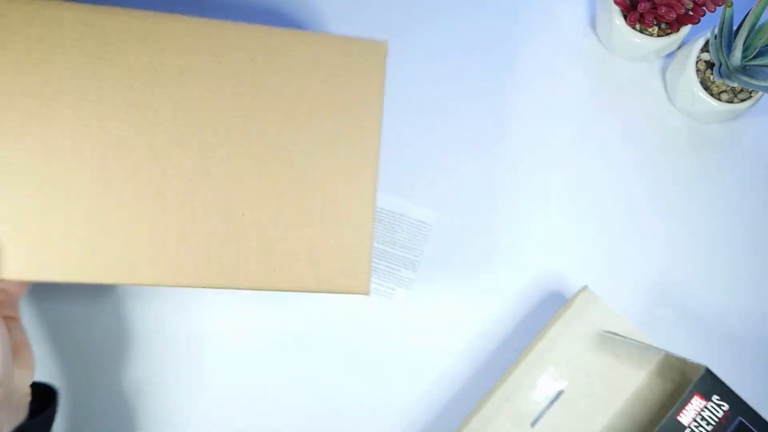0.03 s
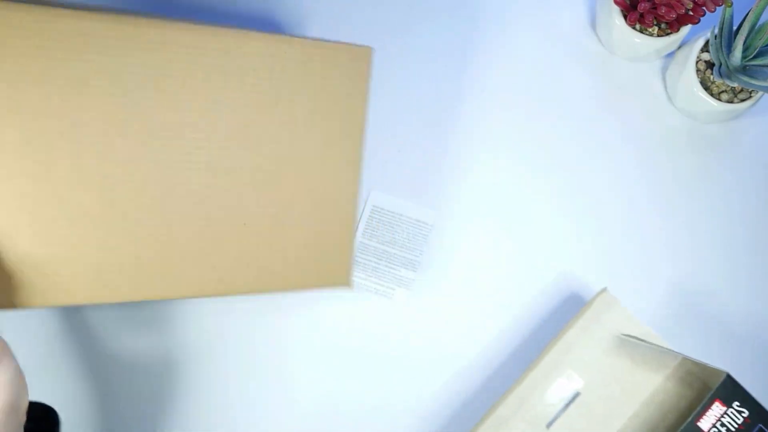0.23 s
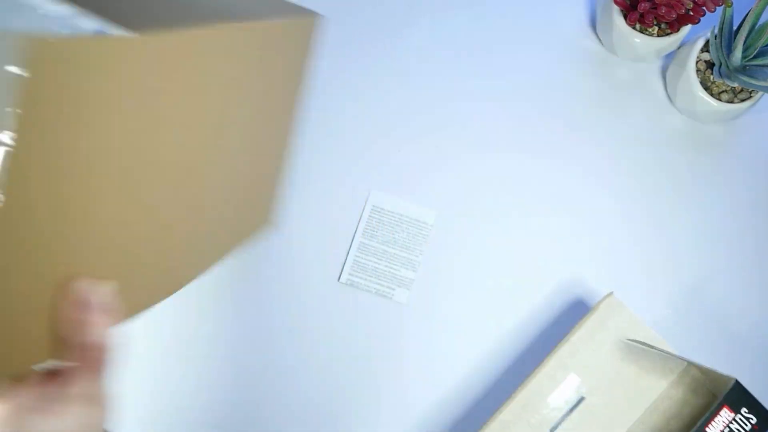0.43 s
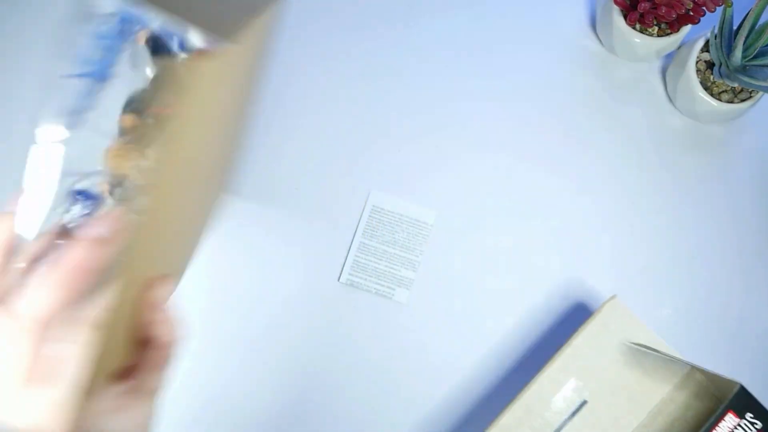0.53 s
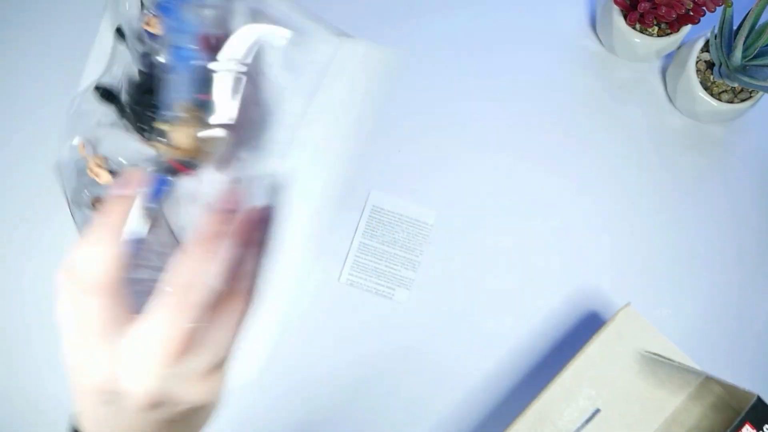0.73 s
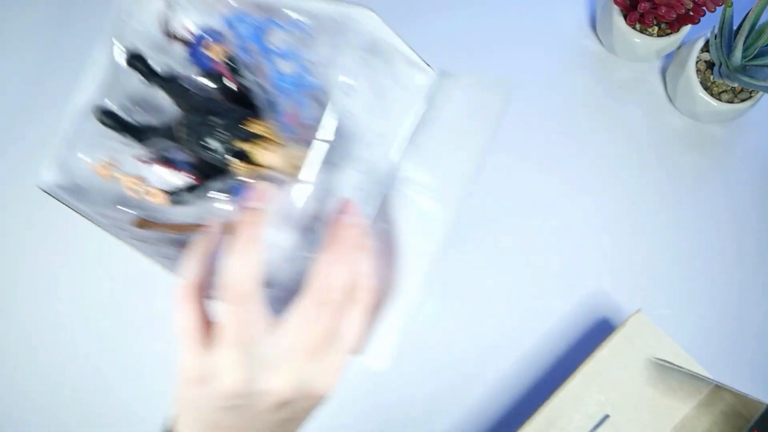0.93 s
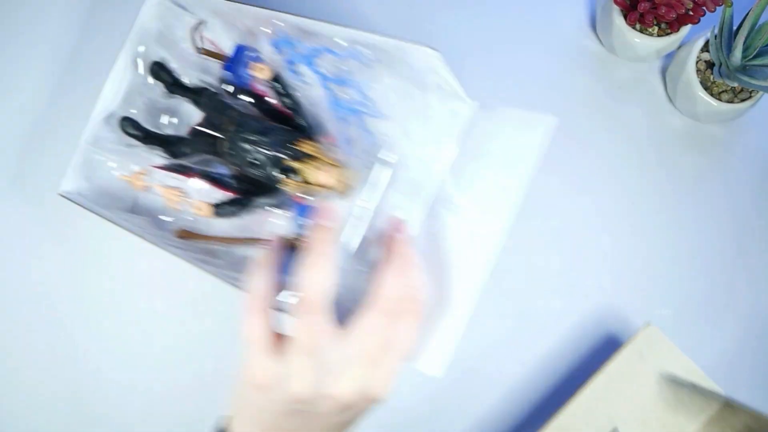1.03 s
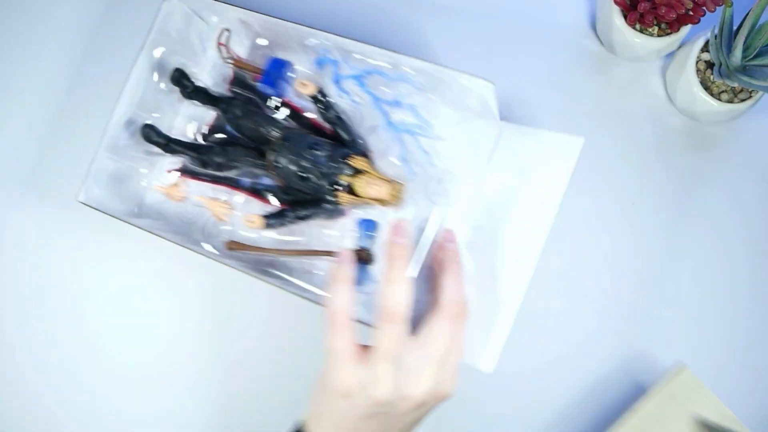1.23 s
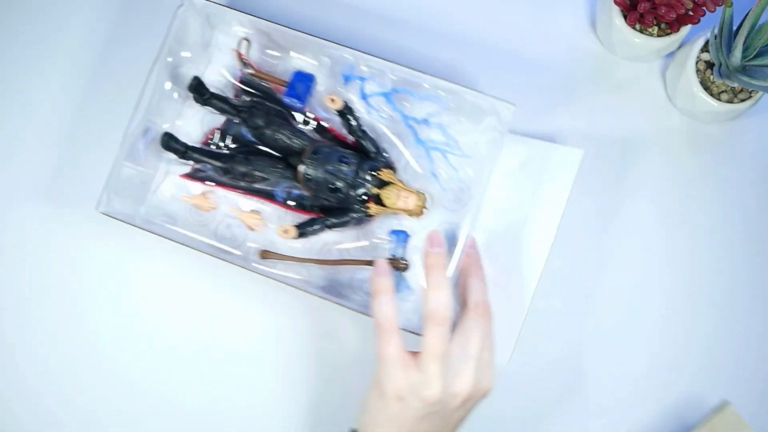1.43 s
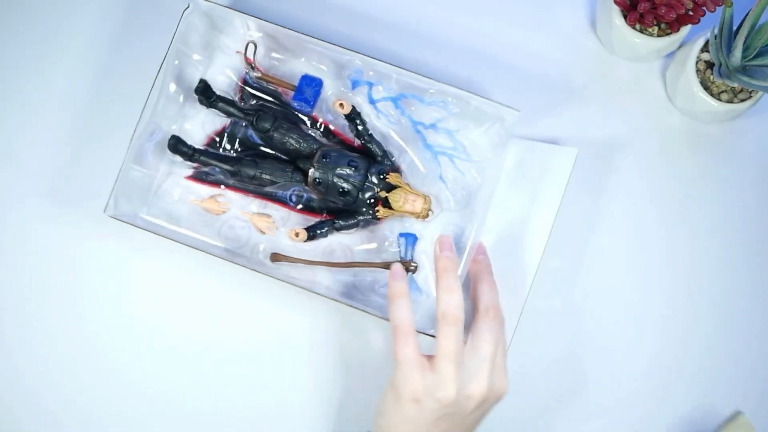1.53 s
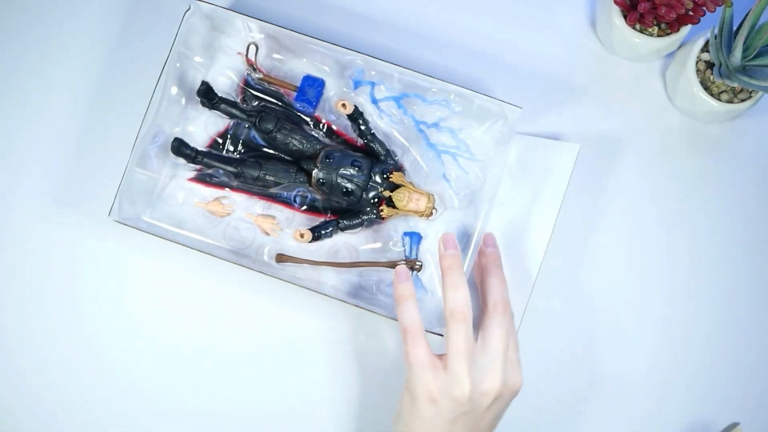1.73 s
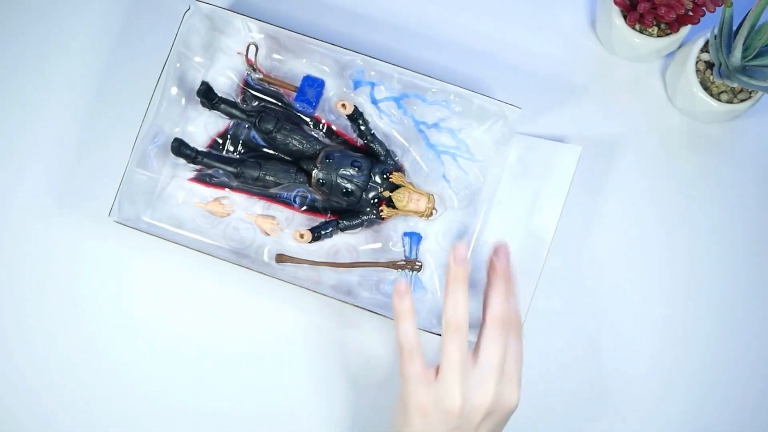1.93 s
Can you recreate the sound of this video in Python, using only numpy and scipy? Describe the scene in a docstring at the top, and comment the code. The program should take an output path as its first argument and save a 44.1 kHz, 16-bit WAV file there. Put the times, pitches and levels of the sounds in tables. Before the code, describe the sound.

Cardboard and plastic tray handling on a table, close in a small quiet room with faint low rumble. A light tap at 0.14 s, then a loud hollow box knock with scuff at 0.25. Softer knocks at 0.5 and 0.6, a plastic rasp near 0.7. A strong clattering set-down at 0.88-0.97, small taps, another knock at 1.43, bright snap at 1.48, then faint sliding until 1.9.

```python
"""A faint low rumble and hum, then a hollow knock: a cardboard box is tipped on a table in a small room.
A plastic tray on its card backing is drawn out, set down, pushed along and dropped flat; a plastic piece snaps.
Knocks are swelling panel sines, a click and box modes; scuffs are friction bursts ringing thin sheets.
Sliding is coloured friction; table and snap are dying modes, the snap with a noise crack."""
import sys
import numpy as np
from scipy import signal
from scipy.fft import rfft, irfft
from scipy.io import wavfile
from scipy.ndimage import uniform_filter1d

SR = 44100
rng = np.random.default_rng(int(sys.argv[2]) if len(sys.argv) > 2 else 0)


def bounce(signal):
    """Save signal as a 16-bit WAV file at the path given by the first command-line argument."""
    frames = np.transpose(np.atleast_2d(signal))
    limited = np.clip(frames, -1, 1)
    pcm = np.round(limited * 32767).astype(np.int16)
    wavfile.write(sys.argv[1], SR, pcm)


N = 88200
T_S = np.arange(N) / SR

# room rumble spectrum: [f/Hz, level/dB]
FLOOR_COLOUR = [(20, 2.5), (45, -8), (75, 1), (110, -2.5), (200, -15.5), (400, -21.5), (1000, -29.5),
                (3000, -32), (10000, -35.5), (16000, -35)]
FLOOR_DB = -67
# low hums: [t/s, length/s, f/Hz, level/dB]
HUMS = [(0, 0.08, 33.5, -48), (0.32, 0.24, 98, -52.5), (1.823, 0.0605, 206, -54)]
HUM_WAVER_RMS_HZ, HUM_WAVER_SMOOTH_S = 9, 0.0091

# cardboard drag level: [t/s, level/dB]
DRAG_LEVEL = [(0, -64), (.12, -104), (.2, -74), (.42, -64.5), (.57, -67), (.61, -52), (.66, -57.5),
              (.76, -68), (.87, -74), (1.1, -69), (1.3, -61.5), (1.4, -64.5), (1.54, -69.5), (1.6, -55.5),
              (1.66, -72.5), (1.79, -64.5), (1.88, -77.5), (2, -103)]
# cardboard drag spectrum: [f/Hz, level/dB]
DRAG_COLOUR = [(60, 9.5), (200, 1.5), (420, 4), (700, -2.5), (1300, -8), (3000, -18), (8000, -30.5),
               (16000, -46)]
# plastic glide level: [t/s, level/dB]
GLIDE_LEVEL = [(0, -99), (.45, -88), (.55, -77), (.66, -72), (.8, -92), (1.2, -78), (1.3, -72), (1.41, -63),
               (1.53, -82), (1.6, -66), (1.645, -78), (1.69, -66.5), (1.77, -79.5), (1.83, -84), (1.9, -97)]
# plastic glide spectrum: [f/Hz, level/dB]
GLIDE_COLOUR = [(300, -17), (1200, -2.5), (3000, 3.5), (6000, -2.5), (10000, -1.5), (16000, -15.5)]
# grain excess: exponential, this mean before capping at 4 means; hiss relative to grain rms
GRAINS_PER_S, GRAIN_SPREAD_DB, FRICTION_HISS_GAIN = 3500, 1.5, 0.64

# blows reaching the table: [t/s, wobble level/dB, top-mode level/dB]
TABLE_BLOWS = [(0.249, -54, -40), (.598, -44, -58), (0.891, -32, -36.5), (1.428, -45.5, -45.5)]
# table-top modes: [f/Hz, level/dB, t60/s]
TABLE_MODES = [(55.7, -7, 0.51), (96.3, -9.5, 0.83), (122.8, -3.5, 0.44), (174.5, -4.5, 0.57),
               (205.6, -2.5, 0.58)]
WOBBLE_HZ, WOBBLE_T60_S, TABLE_PUSH_S = 39.6, 1.0, 0.0043

# hard plastic modes: [f/Hz, level/dB, t60/s]
SNAP_MODES = [(725, -3, 0.081), (1290, -4, 0.036), (1860, 1, 0.027), (2780, -14, 0.12), (3740, -4, 0.067),
              (4180, -0.5, 0.03), (5820, -3, 0.03), (7830, -0.5, 0.033), (8200, -3, 0.039),
              (9033, 1.5, 0.041), (9280, -2, 0.028), (13170, -25, .06)]
# snap crack spectrum: [f/Hz, level/dB]
CRACK_COLOUR = [(300, 6.5), (1500, -10), (2400, -9.5), (3600, 4.5), (5000, -21), (7000, -10), (8500, -5),
                (9600, -2.5), (10500, -49), (16000, -42)]
SNAP_AT_S, SNAP_RISE_S, CRACK_T60_S = 1.4803, 0.00042, 0.025
SNAP_MODES_DB, SNAP_CRACK_DB = -39, -31.5

# cardboard edge scuffs: [t/s, attack/s, hold/s, release t60/s, level/dB, tilt/(dB/octave), resonance f/Hz]
CARD_SCUFFS = [(.234, 0.0027, 0.019, 0.25, -42.5, -.5, 1260), (.295, 0.014, 0.041, .17, -54.5, 1.1, 900),
               (.338, 0.0018, 0.0035, 0.04, -58.5, -9, 2600),
               (.62, 0.0058, 0.0053, 0.11, -60.5, -0.5, 1200), (.885, 0.0026, 0.0086, 0.2, -40, -0.9, 1640),
               (1.159, 0.0016, 0.0024, 0.16, -57, -4, 1000),
               (1.4228, 0.00093, 0.0069, 0.16, -41, -0.25, 1900)]
# card scuff spectrum: [f/Hz, level/dB]
CARD_COLOUR = [(100, -9), (400, -4.5), (800, 1), (1180, 0), (1650, -0.5), (2100, -0.5), (3300, -4),
               (4800, -10), (8500, -10.5), (11000, -14.5), (16000, -22)]
# plastic tray rasps: [t/s, attack/s, hold/s, release t60/s, level/dB, tilt/(dB/octave), resonance f/Hz]
PLASTIC_SCUFFS = [(.162, .001, 0.0031, .11, -63, 0, 2300), (.204, 0.00088, .003, 0.075, -70, -3, 2400),
                  (.688, .013, .01, 0.08, -44.5, .5, 2070), (.72, 0.0032, 0.0096, .18, -55.5, -3.3, 3970),
                  (.821, 0.0014, 0.006, 0.14, -64, -3.3, 1700),
                  (.8760, 0.00036, 0.00073, 0.0041, -35.5, -4, 3770),
                  (1.0475, 0.0013, 0.0083, 0.14, -54.5, -0.9, 2730),
                  (1.828, 0.0013, .004, 0.059, -75, -1.5, 4800)]
# plastic rasp spectrum: [f/Hz, level/dB]
PLASTIC_COLOUR = [(100, -18), (400, -3), (900, -5.5), (1450, -1), (1850, -9), (2300, 2), (3200, -3),
                  (5000, -10), (7500, -8), (10000, -10.5), (12500, -17.5), (16000, -26)]
CATCH_RMS_DB, CATCH_SMOOTH_S = 2.5, 0.003  # edges catch and let go unevenly
TOUCHED_RESONANCE_DB, TOUCHED_RESONANCE_Q = -1, 4.7  # touched part of the sheet
SHEET_T60_S, SHEET_RING_DB = 0.027, -4.5

# knocks on cardboard: [t/s, level/dB, panel f/Hz, swell/s, box ring/dB]
KNOCKS = [(.139, -50, 604, 0.0012, -8), (.142, -59.5, 1340, 0.0015, 16), (.2480, -17.5, 471, 0.0023, -7.5),
          (0.2554, -33, 523, .0025, 8.5), (.269, -33.5, 640, 0.0028, 2), (.4990, -39, 680, 0.0014, -4),
          (.595, -47, 615, 0.0031, 9.5), (0.6275, -31, 704, 0.00088, -3), (.655, -52.5, 520, 0.0058, -12),
          (0.696, -49.5, 374, 0.012, -12), (.823, -54, 480, 0.0034, 12), (0.884, -21, 543, 0.0021, 0),
          (0.8894, -25, 371, .005, 8.5), (0.8971, -31, 980, 0.00067, -26), (.9155, -31, 1160, 0.00094, -1),
          (0.9537, -31, 753, 0.0012, -7), (.9640, -37.5, 1270, 0.001, -12),
          (0.9749, -47.5, 1000, 0.00089, 2), (1.05, -39, 650, 0.00162, -0.5),
          (1.159, -47, 443, 0.0061, -11), (1.1612, -45, 960, 0.00174, -3), (1.276, -46, 510, 0.0025, 0),
          (1.288, -54.5, 590, 0.0016, 0), (1.423, -29.5, 748, 0.0035, 2.5),
          (1.4260, -25.5, 503, 0.0025, 4.5), (1.4328, -37, 218.6, 0.0062, -1),
          (1.4421, -32, 555, 0.0016, -10), (1.724, -64, 1400, 0.0011, -11), (1.798, -54.5, 455, 0.0019, -3)]
# hollow box modes: [f/Hz, level/dB, t60/s]
BOX_MODES = [(217, -23, 0.26), (271.8, -28, .26), (365, -19, 0.26), (447, -28, 0.17), (519, -28.5, 0.32),
             (551, -25.5, 0.35), (653, -25.5, .2), (736, -20, 0.2), (863, -26, 0.17), (971, -32, 0.32),
             (1148, -27.5, 0.14), (1214, -24, 0.29), (1340, -31, .18), (1572, -22.5, .2), (1623, -56, 0.21)]
# contact click spectrum: [f/Hz, level/dB]
CLICK_COLOUR = [(200, -21), (900, -4), (1400, 3.5), (2200, -9), (3500, -20), (7000, -27), (16000, -34.5)]
PANEL_SWELL_POWER = 2.34
CLICK_DB, CLICK_T60_S, HARD_SWELL_S = -15, 0.011, 0.0016  # swells slower than HARD_SWELL_S click less
MODE_SCATTER_DB, CONTACT_EDGE_RATIO = 1.5, 2.07  # blow-to-blow spread; contact cut-off / panel f

ROOM_T60_S, ROOM_DELAY_S = 0.23, 0.0044
KNOCK_ROOM_DB, SCUFF_ROOM_DB = -7, -17.5
CUTOFF_HZ = 15900


def from_db(db):
    """Decibels to amplitude gain."""
    return 10 ** (np.asarray(db) / 20)


def rms_one(x):
    """Scale to unit rms."""
    return x / np.sqrt(np.mean(x ** 2) + 1e-20)


def since(t_s):
    """Seconds since a moment, zero before it."""
    return np.maximum(T_S - t_s, 0)


def decay(t_s, t60_s):
    """Exponential fade, 60 dB per t60, from a moment; 1 before it."""
    return from_db(-60 * since(t_s) / t60_s)


def ring(t_s, hz, t60_s):
    """Damped mode: unit sine dying away from a moment."""
    return np.sin(2 * np.pi * hz * since(t_s)) * decay(t_s, t60_s)


def ring_modes(t_s, modes):
    """Sum of damped modes with alternating signs."""
    return sum(from_db(db) * ring(t_s, hz, t60_s) * (-1) ** k for k, (hz, db, t60_s) in enumerate(modes))


def smooth_noise(smooth_s):
    """Slow random wander, rms 1."""
    return rms_one(uniform_filter1d(rng.standard_normal(N), int(smooth_s * SR)))


def coloured(x, points, tilt_db=0):
    """Shape a spectrum, tilted about 2 kHz in dB per octave; rms 1."""
    hz, db = np.transpose(points)
    octave = np.log2(np.maximum(np.fft.rfftfreq(N, 1 / SR), 1))
    # tilt is constant below the first point
    tilt = tilt_db * (np.maximum(octave, np.log2(hz[0])) - np.log2(2000))
    gain = from_db(np.interp(octave, np.log2(hz), db) + tilt)
    return rms_one(irfft(rfft(x) * gain, N))


def diffuse(x, t60_s, delay_s):
    """Dense reflections or resonances: decaying noise response of unit energy."""
    tail = rng.standard_normal(N) * decay(delay_s, t60_s) * (T_S > delay_s)
    return signal.fftconvolve(x, tail / np.sqrt(np.sum(tail ** 2)))[:N]


def friction():
    """Rubbing: random tiny slips over a smooth hiss."""
    excess = np.minimum(rng.exponential(1, N), 4)
    sizes = from_db(GRAIN_SPREAD_DB * excess) * rng.choice([-1, 1], N)
    grains = rms_one(sizes * (rng.random(N) < GRAINS_PER_S / SR))
    return grains + FRICTION_HISS_GAIN * rng.standard_normal(N)


def room_floor():
    """Quiet room rumble: steady coloured noise."""
    return from_db(FLOOR_DB) * coloured(rng.standard_normal(N), FLOOR_COLOUR)


def low_hums():
    """Brief low sines that rise and fall, wavering in pitch."""
    out = np.zeros(N)
    for t_s, length_s, hz, db in HUMS:
        pitch_hz = hz + HUM_WAVER_RMS_HZ * smooth_noise(HUM_WAVER_SMOOTH_S)
        envelope = np.sin(np.pi * np.minimum(since(t_s) / length_s, 1))
        out += from_db(db) * envelope * np.sin(2 * np.pi * np.cumsum(pitch_hz) / SR)
    return out


def sliding(level, colour):
    """Sustained friction following the effort of the push."""
    return from_db(np.interp(T_S, *np.transpose(level))) * coloured(friction(), colour)


def table():
    """Table wobbles on its legs and its top booms; a finite push softens each onset."""
    out = np.zeros(N)
    for t_s, wobble_db, top_db in TABLE_BLOWS:
        out += from_db(wobble_db) * ring(t_s, WOBBLE_HZ, WOBBLE_T60_S)
        out += from_db(top_db) * ring_modes(t_s, TABLE_MODES)
    push = np.hanning(int(TABLE_PUSH_S * SR))
    return np.convolve(out, push / push.sum())[:N]


def snap():
    """Hard plastic piece against the tray: a noise crack and short bright modes."""
    modes = ring_modes(SNAP_AT_S, SNAP_MODES) * np.minimum(since(SNAP_AT_S) / SNAP_RISE_S, 1)
    burst = rng.standard_normal(N) * (T_S > SNAP_AT_S) * decay(SNAP_AT_S, CRACK_T60_S)
    crack = coloured(burst, CRACK_COLOUR) * np.std(burst)  # restore burst level
    return from_db(SNAP_MODES_DB) * modes + from_db(SNAP_CRACK_DB) * crack


def scuffs(rows, colour):
    """Short uneven friction bursts that set thin sheets ringing, with room reflections."""
    out = np.zeros(N)
    for t_s, attack_s, hold_s, release_t60_s, db, tilt_db, hz in rows:
        attack = np.minimum(since(t_s) / attack_s, 1)
        envelope = attack * decay(t_s + attack_s + hold_s, release_t60_s)
        slips = friction() * from_db(CATCH_RMS_DB * smooth_noise(CATCH_SMOOTH_S))
        b, a = signal.iirpeak(hz, TOUCHED_RESONANCE_Q, fs=SR)
        slips = slips + from_db(TOUCHED_RESONANCE_DB) * signal.lfilter(b, a, slips)
        out += from_db(db) * envelope * coloured(slips, colour, tilt_db)
    out = out + from_db(SHEET_RING_DB) * diffuse(out, SHEET_T60_S, 0)
    return out + from_db(SCUFF_ROOM_DB) * diffuse(out, ROOM_T60_S, ROOM_DELAY_S)


def knocks():
    """Click, a few panel swings, then box modes; softer contacts reach fewer modes."""
    panels, box = np.zeros(N), np.zeros(N)
    click = coloured(rng.standard_normal(N), CLICK_COLOUR)
    for t_s, db, panel_hz, swell_s, ring_db in KNOCKS:
        age = since(t_s) / swell_s
        swell = (age * np.exp(1 - age)) ** PANEL_SWELL_POWER  # peaks at 1 after swell_s
        panels += from_db(db) * swell * np.sin(2 * np.pi * panel_hz * since(t_s))
        click_fade = np.minimum(age, 1) * decay(t_s + swell_s, CLICK_T60_S)
        hardness = min(HARD_SWELL_S / swell_s, 1)
        panels += from_db(db + CLICK_DB) * hardness * click_fade * click
        for mode_hz, mode_db, t60_s in BOX_MODES:
            contact = 1 / np.sqrt(1 + (mode_hz / (CONTACT_EDGE_RATIO * panel_hz)) ** 4)
            scatter_db = MODE_SCATTER_DB * rng.normal()
            strength = from_db(db + ring_db + mode_db + scatter_db) * rng.choice([-1, 1])
            box += contact * strength * ring(t_s + swell_s, mode_hz, t60_s)
    return panels + box + from_db(KNOCK_ROOM_DB) * diffuse(panels, ROOM_T60_S, ROOM_DELAY_S)


def scene():
    """All the handling over the room rumble, one channel."""
    floor = room_floor()
    slides = sliding(DRAG_LEVEL, DRAG_COLOUR) + sliding(GLIDE_LEVEL, GLIDE_COLOUR)
    plastic_snap = snap()
    edges = scuffs(CARD_SCUFFS, CARD_COLOUR) + scuffs(PLASTIC_SCUFFS, PLASTIC_COLOUR)
    return (floor + slides + plastic_snap + edges + knocks() + table() + low_hums())[None]


def record(dry):
    """Steep zero-phase elliptic low-pass."""
    low_pass = signal.ellip(10, 0.05, 60, CUTOFF_HZ, fs=SR, output="sos")
    return signal.sosfiltfilt(low_pass, dry)


dry = scene()
out = record(dry)
bounce(out)
```